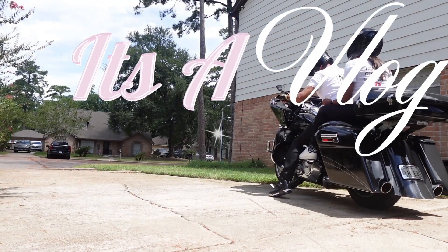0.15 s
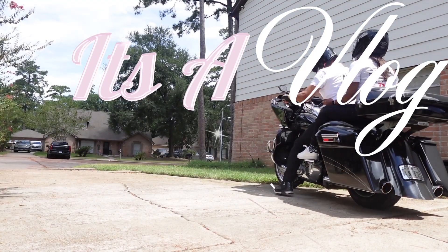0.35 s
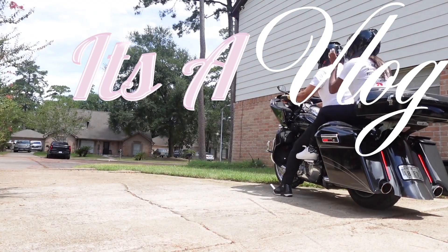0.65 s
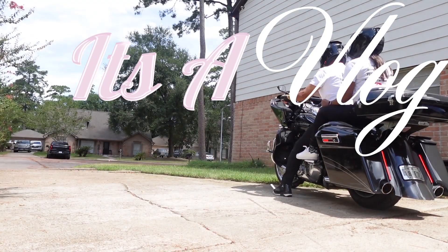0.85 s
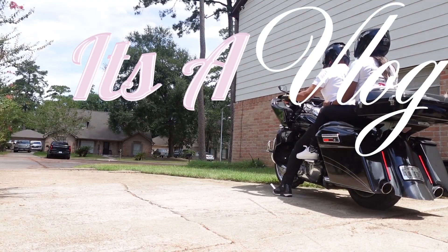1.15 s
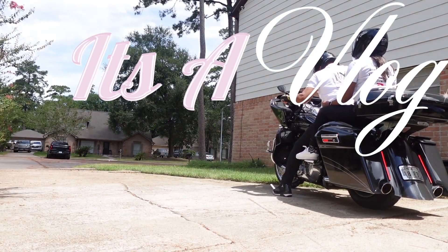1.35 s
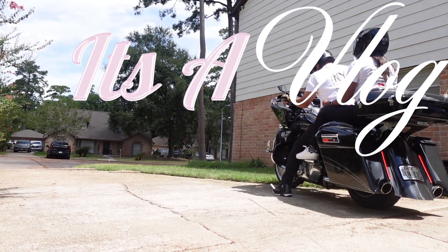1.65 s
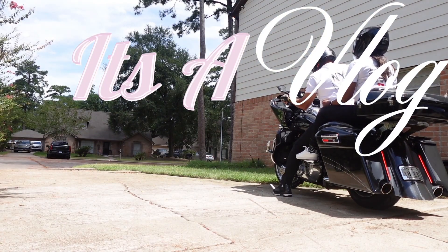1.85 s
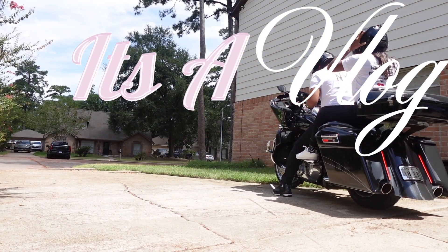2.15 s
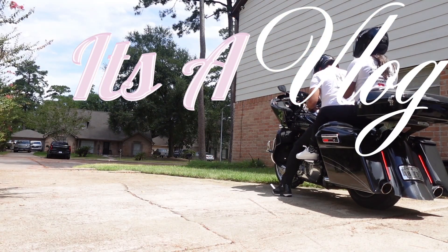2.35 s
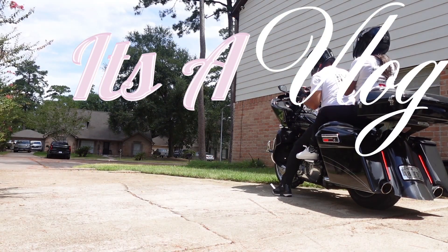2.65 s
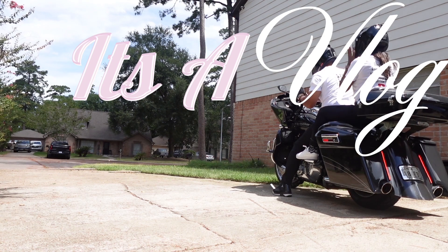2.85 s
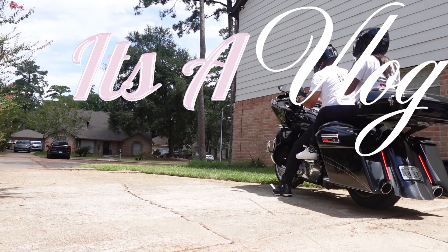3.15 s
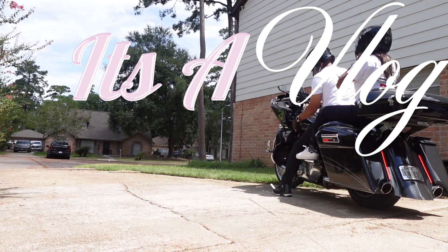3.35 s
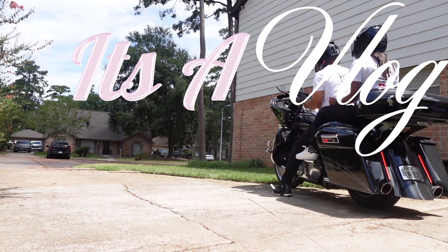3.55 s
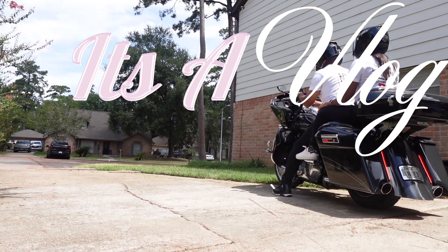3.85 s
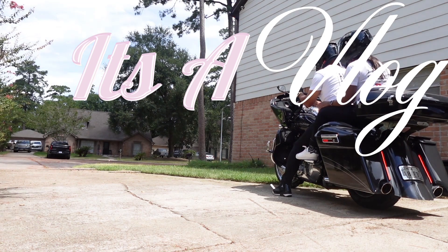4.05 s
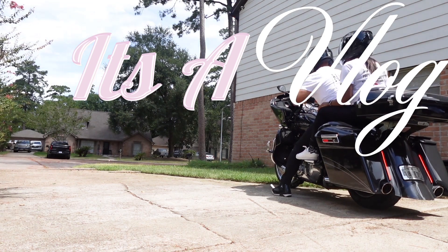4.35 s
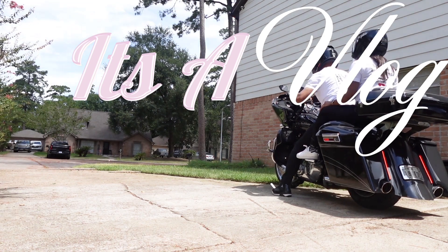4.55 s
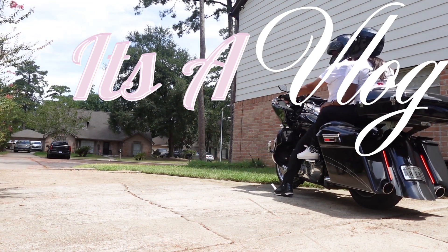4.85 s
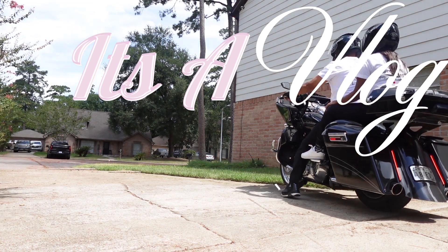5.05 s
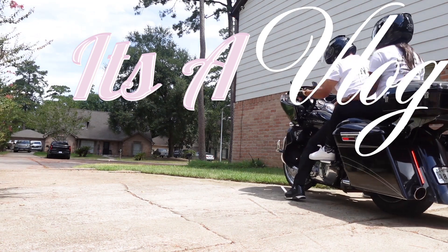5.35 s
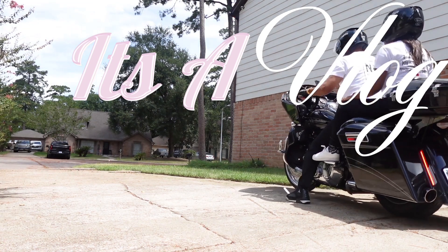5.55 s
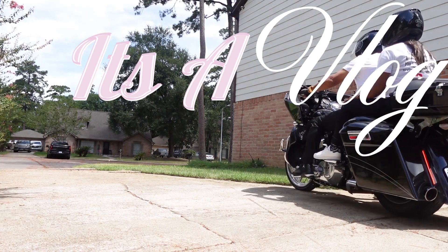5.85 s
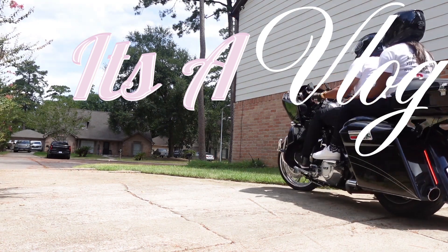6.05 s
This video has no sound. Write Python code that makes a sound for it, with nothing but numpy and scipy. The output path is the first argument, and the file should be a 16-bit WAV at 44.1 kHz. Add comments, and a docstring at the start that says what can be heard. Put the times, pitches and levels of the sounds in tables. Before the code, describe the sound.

A heavy motorcycle cranks briefly on a driveway, catches with a hard blare, settles into uneven throbbing idle, and ends with a gear clunk.

```python
"""Motorcycle start and idle

A big touring motorcycle starts on a concrete driveway beside a house wall, over quiet suburban air.
Switches click, the fuel pump whines, the starter rasps; the engine catches, flares, sinks to a hunting idle.
Each exhaust beat is three pressure surges ringing the pipes; gas spit, valve clatter and gear whine lie on top.
Knocks and squeaks come and go; first gear clunks in at the end.
"""
import sys
import numpy as np
from scipy import signal
from scipy.fft import rfft, irfft
from scipy.io import wavfile
from scipy.ndimage import uniform_filter1d

SR = 44100
rng = np.random.default_rng(int(sys.argv[2]) if len(sys.argv) > 2 else 0)


def transcribe(signal):
    """Save signal, clipped to [-1, 1], as a 16-bit WAV file at the path in sys.argv[1]."""
    frames = np.atleast_2d(signal).T
    limited = np.clip(frames, -1, 1)
    pcm = np.round(limited * 32767).astype(np.int16)
    wavfile.write(sys.argv[1], SR, pcm)


N = 273704
TIME = np.arange(N) / SR

# street air spectrum: freq_hz, relative_db
STREET = [(59, -55), (100, -37), (147, -59), (202, -30.5), (513, -11.5), (583, -5.5), (634, -9.5),
          (950, -8), (1130, -17), (1200, -13), (1390, -9), (1720, -12.5), (2470, -19), (2690, -19.5),
          (16000, -28)]
# far machinery: freq_hz, level_db
HUM = [(597, -60), (1098, -55), (2476, -64), (4323, -65)]
# switches, levers, gear dogs: start_s, level_db, ring_hz, t60_s, crack_re_ring_db
CLICKS = [(.04, -42, 5000, .16, 0), (.397, -35, 2000, .028, -1), (.623, -31.5, 8300, .02, -2),
          (.675, -31, 8300, .02, -6), (.705, -41, 8800, .05, -8), (.716, -41, 7400, .03, -10),
          (.727, -35, 1300, .03, -7), (.756, -42, 5500, .06, -2), (2.857, -27, 9000, .025, 0),
          (4.068, -17, 3100, .04, -18), (4.722, -25, 5000, .1, -8), (4.803, -25, 5600, .04, -10),
          (5.868, -20, 6000, .07, -1), (6.113, -18, 9000, .035, 2), (6.126, -16, 4000, .05, 2),
          (6.138, -18, 7000, .06, 2)]
# fuel pump priming: time_s, pitch_hz, level_db
PUMP = [(.7, 12480, -90), (.735, 12300, -57), (.86, 12200, -56), (.93, 12270, -62), (1., 12250, -68)]
# starter bites, one per compression, the last as the engine catches: start_s, length_s, level_db
RASPS = [(0.99, .037, -18), (1.054, .025, -16.5), (1.086, .021, -15), (1.12, .012, -13),
         (1.136, 0.055, -19.5)]
# starter spectrum: freq_hz, relative_db
STARTER = [(290, -36), (500, -17), (631, -19), (698, -28), (988, -2), (1360, -4.5), (1690, -7), (2730, -7),
           (4150, 4.5), (5160, -6), (5550, 4), (5880, 0), (9920, -7), (14700, -5), (16000, -8.5)]
# air pushed out by the pistons before first firing: start_s, length_s, level_db
PUFFS = [(1.06, 0.007, -26.5), (1.11, 0.006, -31)]
# engine speed, a flare then a hunting idle: time_s, beats_hz
SPEED = [(1.25, 68.55), (1.57, 65.5), (1.67, 61.45), (1.85, 63.14), (2.21, 50.83), (2.41, 53.06),
         (2.57, 51.34), (2.91, 52.12), (2.99, 50.56), (3.29, 51.86), (3.36, 54.05), (3.59, 49.02),
         (3.84, 52.04), (4.02, 47.92), (4.15, 50.02), (4.3, 49.4), (4.43, 51.6), (4.53, 49.5),
         (4.71, 51.66), (4.81, 48.7), (4.96, 51.88), (5.2, 47.32), (5.6, 51.19), (5.85, 48.2),
         (6.03, 51.25), (6.21, 46.47)]
# uneven combustion: time_s, roughness
ROUGH = [(1.14, 1.25), (1.22, 1.1), (1.3, 0.56), (2.2, 0.56), (3.2, 0.63), (3.6, 0.61), (5.2, 0.77),
         (6.2, 0.98)]
# engine load while the cold idle runs fast: time_s, load_0_to_1
THROTTLE = [(1.14, 0.37), (1.25, 1), (1.55, 0.48), (1.66, 0.42), (1.9, 0.36), (2.06, 0.46), (2.17, 0.17),
            (6.2, 0.29)]
# surges in a beat: place_beats, gas_db, gas_length_beats
SURGES = [(0, -3, 0.088), (.432, -7, 0.09), (.587, -8.5, 0.11)]
# pipe resonances: surge_index, freq_hz, width_hz, relative_db
PIPE = [(0, 305, 45, -23), (0, 511, 60, 0), (0, 605, 45, 1), (0, 935, 62, -17), (1, 544, 40, -1),
        (1, 655, 55, -8), (1, 849, 44, -6), (2, 762, 40, -2.5), (2, 802, 40, -5.5), (2, 850, 35, -9)]
# muffler mouth resonances: freq_hz, width_hz, relative_db
MOUTH = [(939, 51, 4.5), (1064, 24, 8), (1319, 57, 5), (1533, 48, -0.5), (1590, 32, -24)]
# resonances that speak under load: freq_hz, width_hz, relative_db
BLARE = [(330, 17, -1.5), (464, 9.9, 1), (632, 19, 4), (733, 28, 10), (772, 62, 6), (937, 22, 11),
         (1050, 27, 13), (1237, 41, 4), (1310, 40, -14), (1630, 50, -34)]
# turbulence spectrum: freq_hz, relative_db
CHURN = [(100, -62), (200, -22), (380, -8), (480, -2.5), (600, 4), (720, -10), (860, 11.5), (1000, -23),
         (1200, -4), (1350, -8.5), (1900, -7), (2600, -53), (6000, -43)]
# gas spit spectrum: freq_hz, relative_db
SPIT = [(400, -59), (1000, 15.5), (2200, -3), (2800, -18), (4000, 6.5), (5000, -7), (8000, -34),
        (16000, -47.5)]
# valve spectrum: freq_hz, relative_db
VALVES = [(1060, -37), (1800, -4.5), (2370, -10.5), (2590, -12), (3320, -1), (3710, -12), (4060, -10),
          (4620, -15), (5640, -11.5), (6180, -12), (7290, -11.5), (8130, -13), (14700, -17), (15400, -16.5),
          (16000, -26.5)]
# engine case resonances: freq_hz, width_hz, relative_db
CASE = [(3400, 930, -5.5), (4000, 310, -6), (5610, 360, 0.5), (7080, 320, -6), (11300, 540, -9)]
# dull knocks through the frame: start_s, level_db, t60_s
THUMPS = [(1.18, -40, .1), (2.857, -40, 0.039), (5.868, -35, 0.048), (6.126, -43, 0.084)]
# seat and suspension squeaks: start_s, length_s, start_hz, end_hz, level_db
SQUEAKS = [(4.842, 0.0445, 5270, 4676, -30.5), (4.841, .025, 15600, 15100, -32),
           (4.89, 0.036, 14100, 14800, -33)]
# bike to the right: freq_hz, left_minus_right_db
PAN = [(150, 0), (300, -.2), (550, -.5), (1000, -1.1), (2000, -1.7), (4000, -3), (8000, -2.6),
       (13000, -1.5)]

STREET_DB = -48.2
RASP_ATTACK_S, RASP_T60_S, STARTER_SPIN_DB = 0.0062, 0.1, -28
PUFF_ATTACK_S, PUFF_T60_S = .004, 0.067
# first firings are slow; the engine picks up as the pipes fill with pressure
CATCH_S, CATCH_HZ, CATCH_DB = 1.14, 49.24, -0.5
PICKUP_S, PICKUP_LENGTH_S, FIRST_BOOM_SHARE = 1.19, .025, 0.54
BEAT_AT_S = 1.2529  # a beat falls exactly here
# below idle the engine labours; well above, it flares
IDLE_HZ, FAST_HZ, FLARE_HZ = 51.77, 53.7, 66
# burning is heard to change before the flywheel follows
FLYWHEEL_LAG_S = 0.012
# low and high exhaust bands: unloaded level, change per Hz of sag, at full flare, at full load
BOOM_DB, BOOM_DB_PER_HZ, BOOM_FLARE_DB, BOOM_LOAD_DB = -16, -0.37, -3.5, 3
BARK_DB, BARK_DB_PER_HZ, BARK_FLARE_DB, BARK_LOAD_DB = -20, 0.77, 5, 2
# clatter gain when burning evenly, rise per unit of roughness
CLATTER_DB, CLATTER_ROUGH_DB = -30, 3.6
# gear whine grows once the idle has settled
WHINE_FROM_S, WHINE_RISE_S, WHINE_FIRST_SHARE = 3, .9, 0.52
GEAR_MESH_PER_BEAT = 67
TOP_HZ = 16000


def undb(db):
    """Decibels to gain."""
    return 10 ** (np.asarray(db) / 20)


def unit(x):
    """Scale to rms 1."""
    return x / np.sqrt(np.mean(x ** 2))


def steady(x):
    """Even out the running level over an eighth of a second."""
    power = uniform_filter1d(x ** 2, SR // 8).clip(0)
    return x / np.sqrt(power + np.var(x) / 20)


def curve(rows, axis=1):
    """One table column, joined by straight lines in time."""
    rows = np.array(rows)
    return np.interp(TIME, rows[:, 0], rows[:, axis])


def ramp(start_s, length_s):
    """Straight rise from 0 to 1."""
    return np.clip((TIME - start_s) / length_s, 0, 1)


def bursts(rows, attack_s, t60_s):
    """Gain of events that rise, hold and decay; the strongest at each moment counts."""
    gains = []
    for start_s, length_s, db in rows:
        decay_db = -60 * np.clip((TIME - start_s - length_s) / t60_s, 0, 3)
        gains.append(ramp(start_s, attack_s) * undb(db + decay_db))
    return np.max(gains, axis=0)


def noise():
    """White noise."""
    return rng.standard_normal(N)


def walk(rate_hz):
    """Smooth random wandering, spread near 1."""
    step = int(SR / rate_hz)
    held = np.repeat(rng.standard_normal(N // step + 1), step)
    return 1.3 * uniform_filter1d(held, step)[:N]


def colour(x, points):
    """Filter by a spectrum of freq_hz, level_db points."""
    hz, db = np.transpose(points)
    bins_hz = np.arange(N // 2 + 1) * SR / N
    gain = undb(np.interp(np.log(bins_hz + 1), np.log(hz), db))
    return irfft(rfft(x) * gain, N)


def ring(x, hz, width_hz):
    """One resonance, gain 1 at its centre."""
    return signal.lfilter(*signal.iirpeak(min(hz, SR / 2 - 1000), hz / width_hz, fs=SR), x)


def ring_all(x, rows):
    """Parallel resonances from freq_hz, width_hz, relative_db rows."""
    return sum(undb(db) * ring(x, hz, width_hz) for hz, width_hz, db in rows)


def edge(x, hz, kind, order):
    """Low-pass or high-pass."""
    return signal.sosfilt(signal.butter(order, hz, kind, fs=SR, output="sos"), x)


def pulses(beats, place, rough, scatter_db, jitter_s):
    """One pulse a beat, with bounded random size and timing error."""
    first = np.ceil(np.interp(1.13, TIME, beats))
    marks = np.arange(first, beats[-1] - 1) + place
    chance = np.tanh(rng.standard_normal((len(marks), 2)))
    at_s = np.interp(marks, beats, TIME)
    wobble = np.interp(at_s, TIME, rough)
    index = np.clip((at_s + jitter_s * wobble * chance[:, 0]) * SR, 0, N - 1).astype(int)
    return np.bincount(index, undb(scatter_db * wobble * chance[:, 1]), N)


def gate(beats, place, sigma_beats):
    """Gaussian window that opens once a beat."""
    offset = (beats - place + .5) % 1 - .5
    return np.exp(-.5 * (offset / sigma_beats) ** 2)


def recurring(beats, share, size=860):
    """Noise of which a share of the power repeats on every beat."""
    pattern = signal.resample(rng.standard_normal(size), 8 * size)
    share = np.clip(share, 0, 1)
    repeated = pattern[(beats % 1 * (len(pattern) - 1)).astype(int)]
    return np.sqrt(share) * repeated + np.sqrt(1 - share) * noise()


def street():
    """Quiet suburban air, coloured noise, with a faint far hum of narrow resonances."""
    air = unit(colour(noise(), STREET)) * undb(STREET_DB + 0.76 * walk(22.7))
    hum = sum(undb(db) * unit(ring(noise(), hz, 14.0)) for hz, db in HUM)
    return air + hum


def clicks():
    """Short metal contacts: a broad crack and one damped ring."""
    out = np.zeros(N)
    crack = unit(colour(noise(), [(100, -40), (400, -14), (1200, 0), (7000, -2), (16000, -6)]))
    for start_s, db, hz, t60_s, crack_db in CLICKS:
        age_s = np.maximum(TIME - start_s, 0)
        fade = (1 - np.exp(-age_s / 0.00082)) * undb(-60 * np.minimum(age_s / t60_s, 2))
        out += undb(db) * fade * (unit(ring(noise(), hz, 900)) + undb(crack_db) * crack)
    return out


def pump():
    """Thin sine whine that sags as fuel pressure builds."""
    hz = curve(PUMP) + 14 * walk(120)
    tone = np.sqrt(2) * np.sin(2 * np.pi * np.cumsum(hz) / SR)
    on = (TIME > PUMP[0][0]) * (TIME < PUMP[-1][0])
    return tone * undb(curve(PUMP, axis=2)) * on


def starter():
    """Gear teeth rasp on the ring gear, hardest at each compression; pistons puff air."""
    teeth = noise() * undb(1.4 * walk(900))
    puffs = unit(colour(noise(), CHURN))
    spin = (RASPS[0][0], CATCH_S - RASPS[0][0], STARTER_SPIN_DB)
    rasp = unit(colour(teeth, STARTER)) * bursts([spin, *RASPS], RASP_ATTACK_S, RASP_T60_S)
    return rasp + puffs * bursts(PUFFS, PUFF_ATTACK_S, PUFF_T60_S)


def picked_up():
    """Progress from first firings to full running, 0-1."""
    return ramp(PICKUP_S, PICKUP_LENGTH_S)


def engine_load():
    """Engine load, 0-1."""
    return curve(THROTTLE).clip(0, 1)


def effort(speed_hz):
    """Boom and bark levels: load swells the exhaust; sag or flare hardens it."""
    coming_hz = np.interp(TIME + FLYWHEEL_LAG_S, TIME, speed_hz)
    sag_hz = np.maximum(IDLE_HZ - coming_hz, 0)
    flare = np.sqrt(np.clip((speed_hz - FAST_HZ) / (FLARE_HZ - FAST_HZ), 0, 1))
    load = engine_load()
    boom_db = BOOM_DB + BOOM_DB_PER_HZ * sag_hz + BOOM_FLARE_DB * flare + BOOM_LOAD_DB * load
    bark_db = BARK_DB + BARK_DB_PER_HZ * sag_hz + BARK_FLARE_DB * flare + BARK_LOAD_DB * load
    return boom_db, bark_db


def exhaust(beats, speed_hz, rough):
    """Surges ring the pipes; turbulence rides on them; load brings out the blare."""
    load = engine_load()
    surges = [pulses(beats, place, rough, scatter_db=2.2, jitter_s=.00011) for place, _, _ in SURGES]
    # late surge grows when the engine runs lumpy
    surges[2] = surges[2] * (.9 + .5 * rough)

    pipes = sum(undb(db) * ring(surges[int(k)], hz, width_hz) for k, hz, width_hz, db in PIPE)
    pipes = unit(edge(edge(pipes, 220.4, "high", order=8), 1640, "low", order=2))
    mouth = unit(ring_all(surges[0] + .5 * surges[1], MOUTH))
    blare = ring_all(surges[0] + .8 * surges[1] + .45 * surges[2], BLARE)
    blare = unit(edge(edge(blare, 302, "high", order=6), 1250, "low", order=2))
    flow = .45 + gate(beats, .04, .06) + gate(beats, .7, .09)
    churn = unit(edge(colour(noise() * flow, CHURN), 208, "high", order=4))

    sound = (1 - .8 * load) * pipes + load * blare
    sound = sound + undb(-11) * edge(mouth, 325, "high", order=4)
    sound = sound + undb(-5.0) * rough * churn
    # muffler chamber cancels part of a narrow band
    sound = sound - undb(-8.0) * ring(sound, 367, 123)

    boom = colour(sound, [(700, 0), (860, -53), (1100, -69)])
    bark = sound - boom
    boom_db, bark_db = effort(speed_hz)
    # first firings crack before the pipes fill
    filled = FIRST_BOOM_SHARE + (1 - FIRST_BOOM_SHARE) * picked_up()
    return undb(boom_db) * filled * steady(boom) + undb(bark_db) * steady(bark)


def clatter(beats):
    """Gas spits with each surge; valves rattle the case; gears sing at a multiple of engine speed."""
    load, rough = engine_load(), curve(ROUGH)
    regular = .75 - .6 * rough
    spit = sum(undb(db) * gate(beats, place, length / 2) for place, db, length in SURGES)
    spit = unit(colour(recurring(beats, regular) * spit * undb(1.6 * walk(50)), SPIT))
    taps = 1 + .5 * gate(beats, 0.29, 0.098) + 1.2 * gate(beats, 0.77, 0.36)
    taps = taps * undb(2 * walk(600))
    valves = unit(colour(recurring(beats, regular * .7) * taps, VALVES))
    # each case mode gets its own noise
    case = [undb(db) * ring(recurring(beats, regular) * taps, hz, width_hz) for hz, width_hz, db in CASE]
    case = unit(sum(case))

    # some firings snap harder than others
    snaps = pulses(beats, 0, np.ones(N), scatter_db=3.5, jitter_s=.00008)
    snaps = unit(ring(ring(snaps, 2050, 750), 2050, 750))
    snaps = snaps * (.6 + .7 * rough) * (1 - load)
    # under load the second surge cracks as well
    cracks = pulses(beats, .39, np.ones(N), scatter_db=-2.5, jitter_s=.00005)
    cracks = unit(ring(ring(cracks, 2700, 2200), 2500, 2200))

    whine = np.sqrt(2) * np.sin(2 * np.pi * GEAR_MESH_PER_BEAT * beats + .9 * walk(110))
    growth = WHINE_FIRST_SHARE + (1 - WHINE_FIRST_SHARE) * ramp(WHINE_FROM_S, WHINE_RISE_S)
    whine = whine * undb(2.2 * walk(25)) * growth

    hiss = undb(-6.0) * spit + undb(-1.5) * valves + undb(-9.0) * case
    ticks = undb(-6) * snaps + undb(-5) * cracks * load
    mix = edge(hiss + ticks + undb(-13.5) * whine, 285, "high", order=4)
    return undb(CLATTER_DB + CLATTER_ROUGH_DB * rough) * mix


def engine():
    """Integrated speed gives the beat phase that drives exhaust and clatter from first firing."""
    speed_hz = CATCH_HZ + (curve(SPEED) - CATCH_HZ) * picked_up()
    beats = np.cumsum(speed_hz) / SR
    beats = beats - np.interp(BEAT_AT_S, TIME, beats)
    running = ramp(CATCH_S, .003) * undb(CATCH_DB * (1 - picked_up()))
    return running * (exhaust(beats, speed_hz, curve(ROUGH)) + clatter(beats))


def thumps():
    """Dull frame knocks: low-passed noise under fast decays."""
    body = unit(edge(noise(), 230, "low", order=2))
    gain = np.zeros(N)
    for start_s, db, t60_s in THUMPS:
        gain += undb(db - 60 * np.clip((TIME - start_s) / t60_s, 0, 2)) * (TIME > start_s)
    return body * gain


def squeaks():
    """Brief rubbing tones that glide."""
    out = np.zeros(N)
    for start_s, length_s, start_hz, end_hz, db in SQUEAKS:
        part = ramp(start_s, length_s)
        hz = start_hz + (end_hz - start_hz) * part + 120 * walk(660)
        tone = np.sqrt(2) * np.sin(2 * np.pi * np.cumsum(hz) / SR)
        out += undb(db) * np.sin(np.pi * part) * tone
    return out


def scene():
    """Bike and street leaning right, with faint decaying scatter from wall and driveway."""
    near = engine() + starter() + clicks() + thumps() + squeaks() + pump()
    direct = near + street()
    bright = edge(near, 2400, "high", order=3)
    age_s = TIME[:SR // 4]
    out = []
    for side in (1, -1):  # left, right
        scatter = rng.standard_normal(len(age_s)) * undb(-60 * age_s / 0.46) * (age_s > .006)
        wall = signal.fftconvolve(bright, scatter / np.linalg.norm(scatter))[:N]
        pan = [(hz, side * db / 2) for hz, db in PAN]
        out.append(colour(direct + undb(-20.5) * wall, pan))
    return np.array(out)


def record(dry):
    """Round the highest peaks smoothly, then cut steeply above TOP_HZ."""
    ceiling = .82
    rounded = dry / (1 + (dry / ceiling) ** 10) ** (1 / 10)
    return signal.sosfilt(signal.ellip(10, .2, 80, TOP_HZ, fs=SR, output="sos"), rounded)


dry = scene()
out = record(dry)
transcribe(out)
```